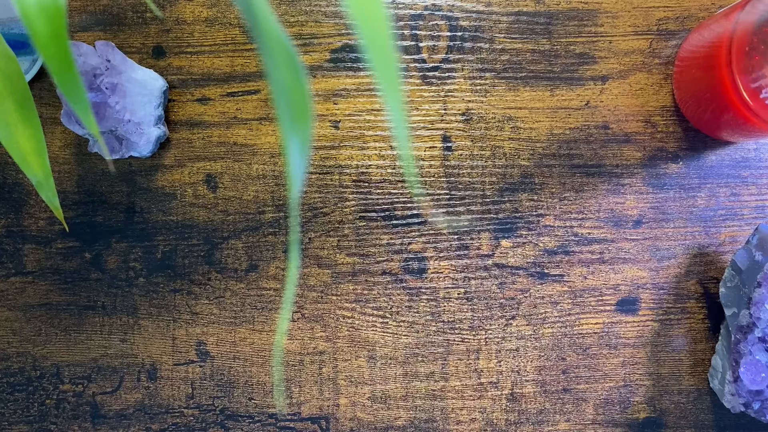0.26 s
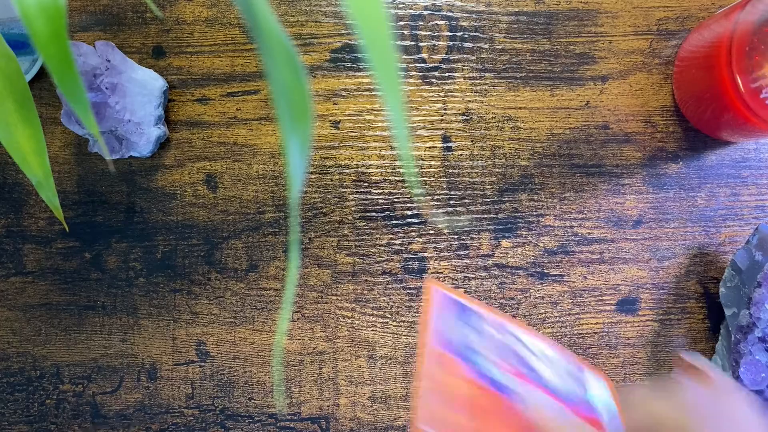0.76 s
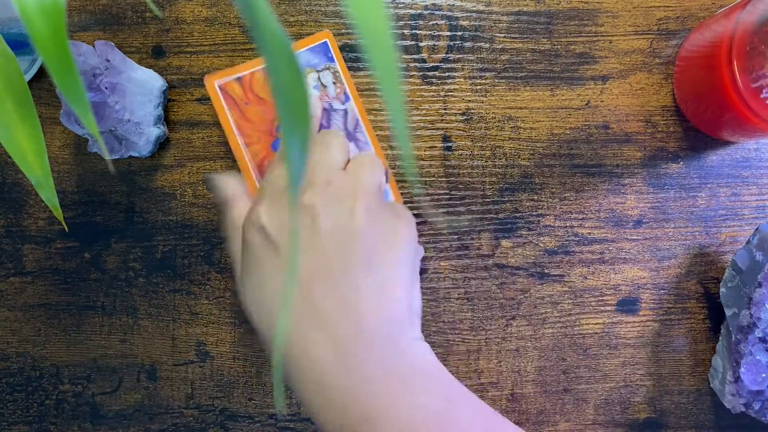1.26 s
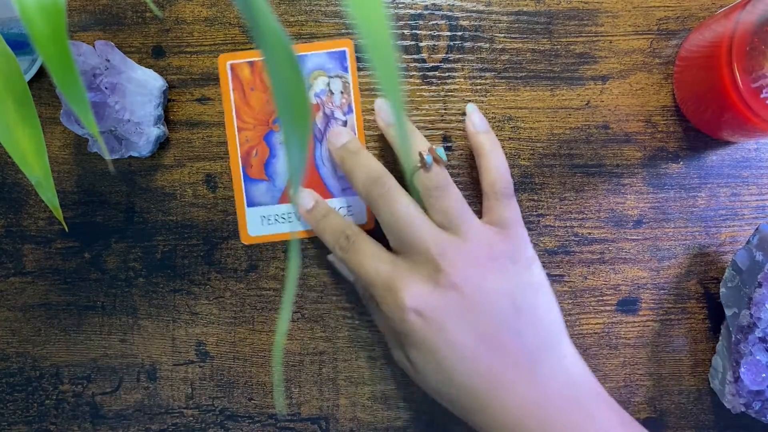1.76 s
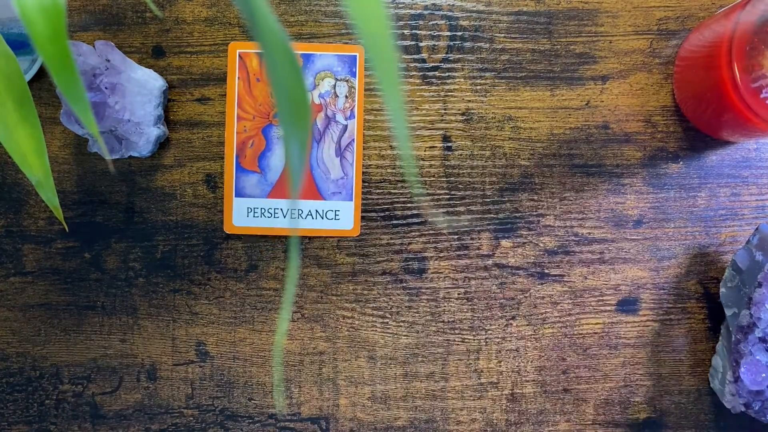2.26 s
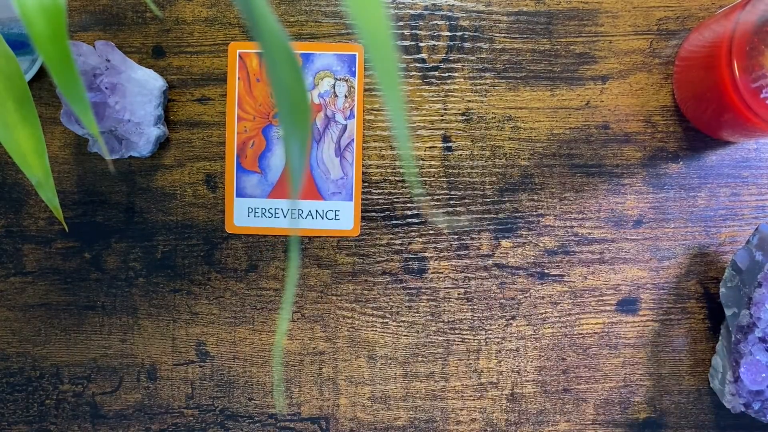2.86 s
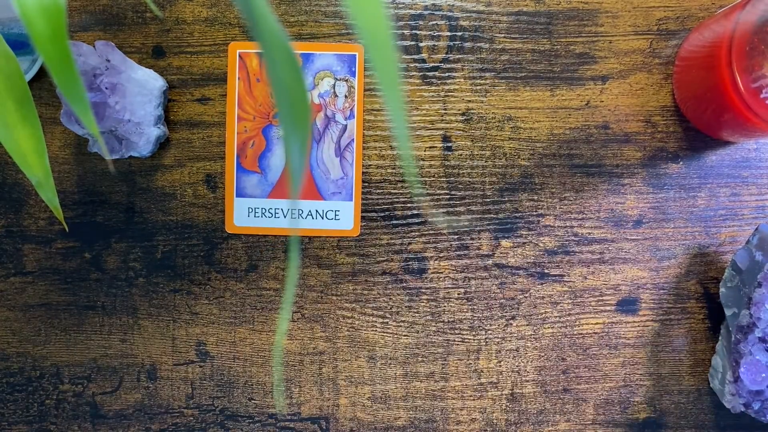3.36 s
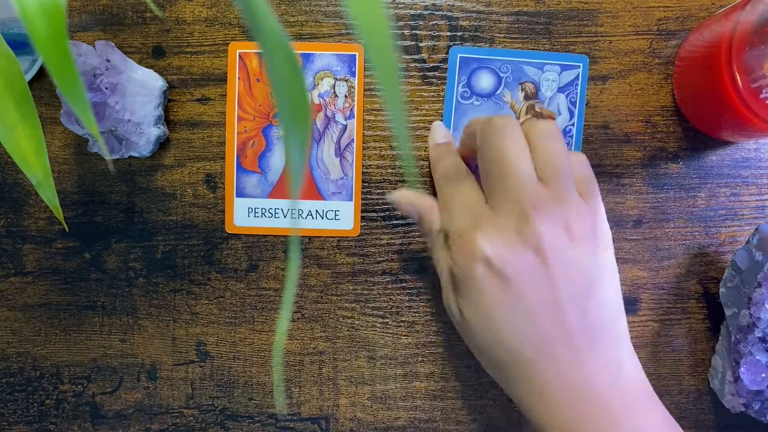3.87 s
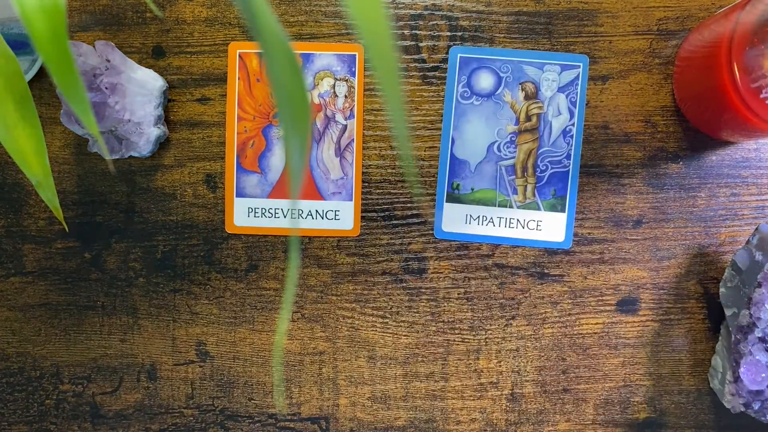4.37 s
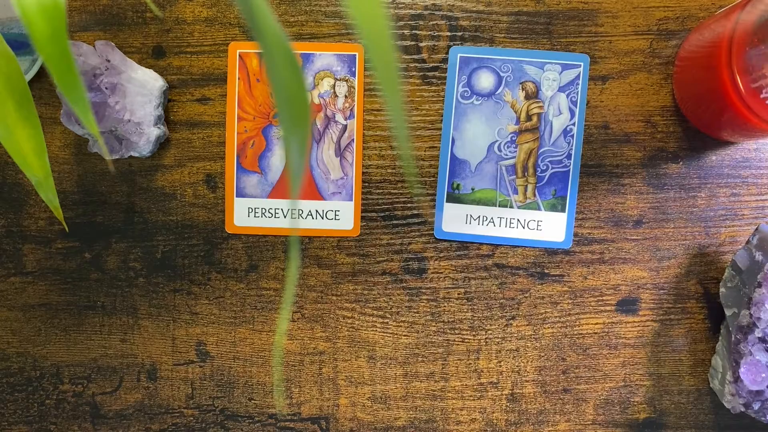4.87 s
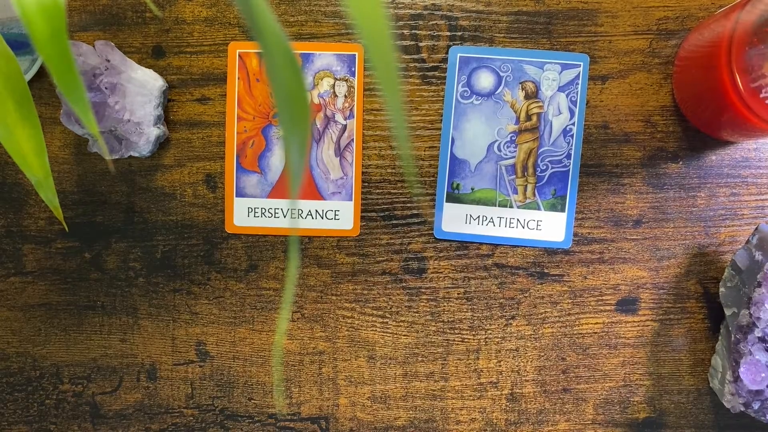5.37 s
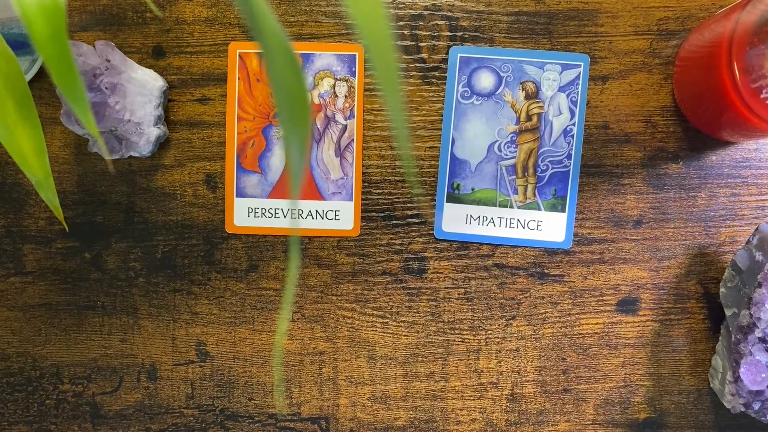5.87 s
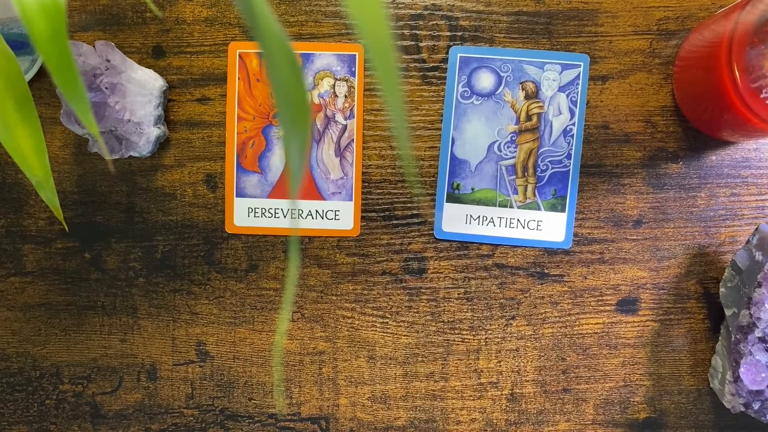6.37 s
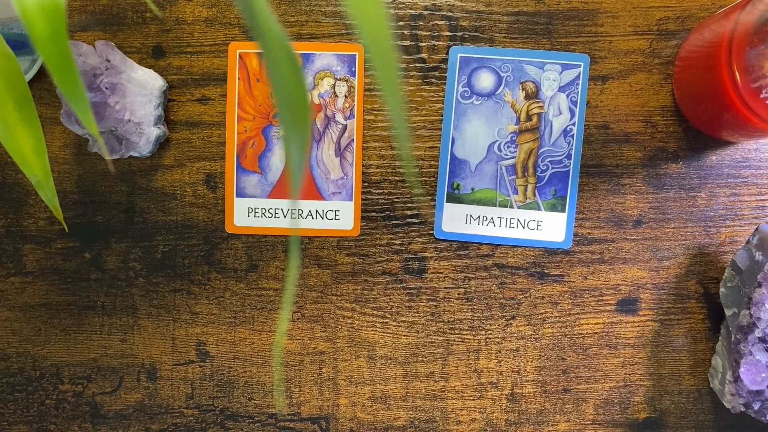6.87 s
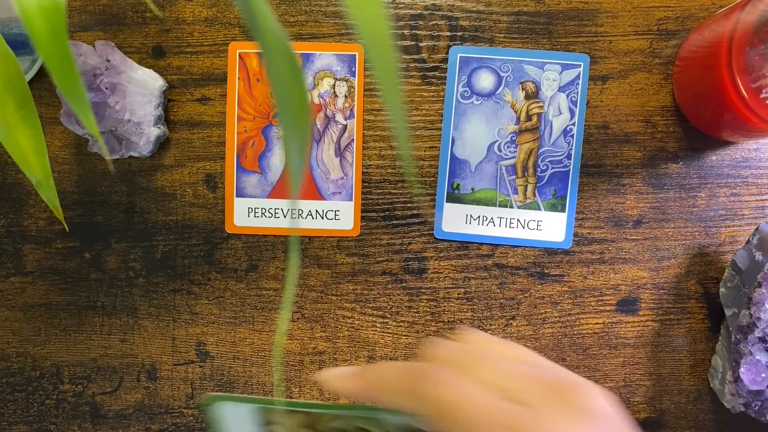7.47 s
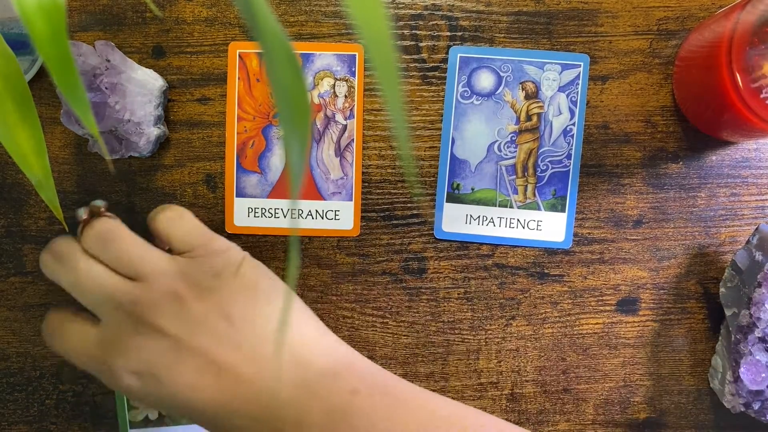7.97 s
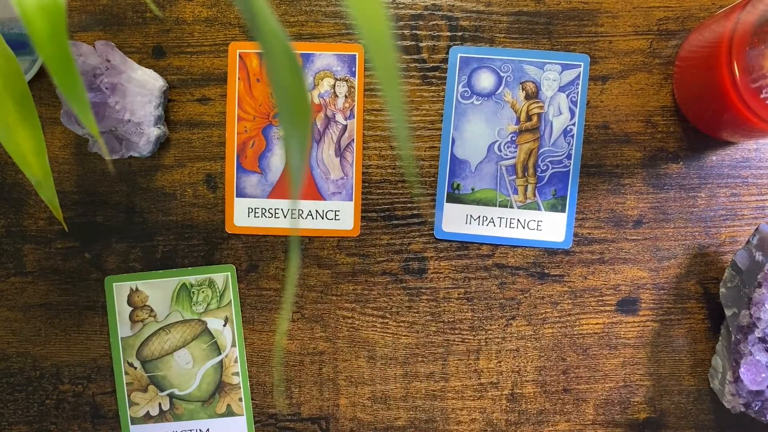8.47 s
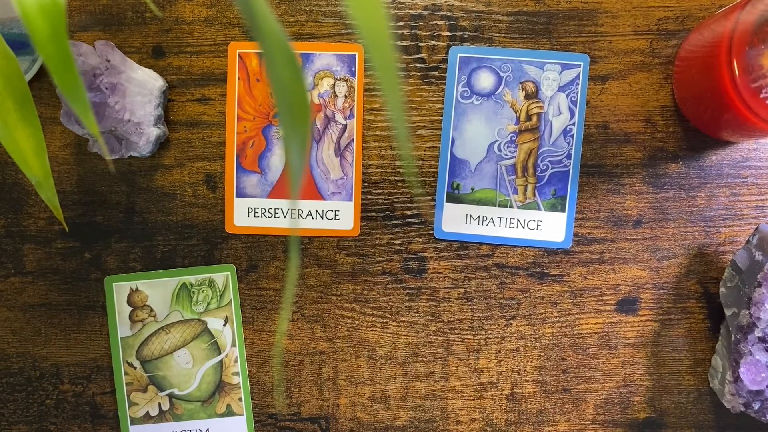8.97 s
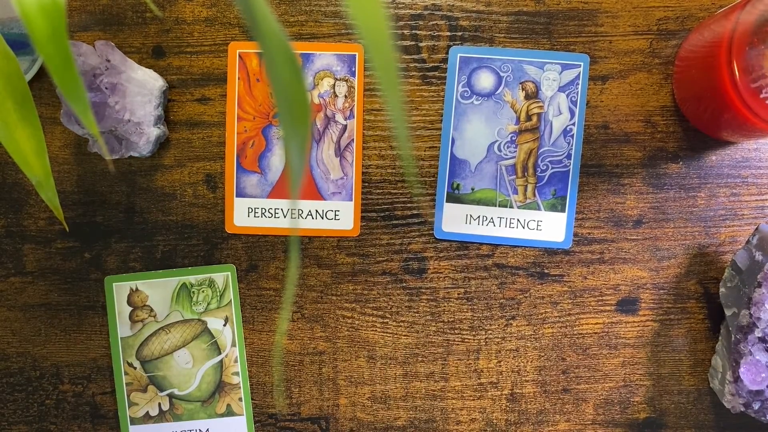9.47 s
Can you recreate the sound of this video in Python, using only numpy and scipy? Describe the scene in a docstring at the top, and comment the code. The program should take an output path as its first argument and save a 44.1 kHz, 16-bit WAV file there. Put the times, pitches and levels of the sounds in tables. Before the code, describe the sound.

Stiff cards are handled and laid on a wooden table, heard up close in a small furnished room. A faint low motor hum runs from the start, weakens around 3 seconds and is gone by 5. Crisp edge snaps, swishes and a thud come at about 0.3 to 0.7 seconds, followed by lighter taps and scrapes. The sharpest double snap lands near 2.6 seconds, as one card slides off the deck in a smooth hiss lasting until about 3.7. Firm snaps and knocks cluster between 3.1 and 4 seconds. From 4.4 to 5, fingers thud on the wood and set it rumbling. Softer rubbing follows, then scattered flicks, slides and taps from 6 to 8 seconds. After a brief near-silent pause, more dull knocks, light snaps and low rumbling run from 8.7 seconds to almost 10.

```python
"""A wooden table in a small furnished room, heard up close from a phone resting on it.
Stiff cards are drawn off a deck, flexed, snapped and laid down: edges crack, faces swish past each
other and scrape over grain and cloth, fingers thud the board and set it ringing and rumbling.
One glossy card slides off in a long hiss. A motor hums through the first five seconds.
Between gestures the sound sinks to near silence."""
import sys
import numpy as np
from scipy import signal
from scipy.fft import rfft, irfft
from scipy.io import wavfile
from scipy.ndimage import uniform_filter1d

SR = 44100
rng = np.random.default_rng(int(sys.argv[2]) if len(sys.argv) > 2 else 0)


def wrap_up_sound(samples):
    """Save the sound to the file named by the first command line argument, as 16-bit audio."""
    columns = np.atleast_2d(samples).T
    # keep every value between -1 and 1, then stretch to whole-number steps
    tamed = np.clip(columns, -1, 1)
    steps = np.round(tamed * 32767).astype(np.int16)
    wavfile.write(sys.argv[1], SR, steps)


N = 429093
ATTACK_S = 0.13  # drags, ringings and the glide fade in by 60 dB over this time


def undb(db):
    return 10 ** (np.asarray(db) / 20)


def unit(x):
    return x / np.sqrt(np.mean(x ** 2))


def decay(t, t60):
    return np.exp(-np.log(1000) * t / t60)


def ring(t, hz, t60):
    return np.sin(2 * np.pi * hz * t) * decay(t, t60)


def band(x, lo_hz, hi_hz):
    sos = signal.butter(2, [lo_hz, min(hi_hz, .45 * SR)], "band", fs=SR, output="sos")
    return signal.sosfilt(sos, x)


def colour(x, points):
    """EQ through (frequency [Hz], gain [dB]) points; rms 1."""
    hz, db = np.transpose(points)
    freqs = np.maximum(np.arange(len(x) // 2 + 1) * SR / len(x), 1)
    gain = undb(np.interp(np.log(freqs), np.log(hz), db))
    return unit(irfft(rfft(x) * gain, len(x)))


def wander(rate_hz):
    """Slewed sample-and-hold modulation; rms 1."""
    step = int(SR / rate_hz)
    held = np.repeat(rng.standard_normal(N // step + 1), step)
    return unit(uniform_filter1d(held, step)[:N])


def add(out, start_s, x):
    i = int(start_s * SR)
    out[i:i + len(x)] += x[:N - i]


def gesture_power(start, db, attack, hold, release):
    """Summed power envelope of gestures; attack and release each span 60 dB."""
    t = np.arange(0, N + 64, 64) / SR
    start, db, attack, hold, release = (
        np.broadcast_to(c, len(start))[:, None] for c in (start, db, attack, hold, release))
    early = np.maximum(start - t, 0) / np.maximum(attack, .005)
    late = np.maximum(t - start - hold, 0) / np.maximum(release, .03)
    power = np.sum(undb(db - 60 * (early + late)) ** 2, axis=0)
    return np.interp(np.arange(N) / SR, t, power)


# the motor's fader: (time [s], level [dB])
HUM_FADER = [(0, -49), (2.7, -48.5), (3.6, -55.5), (4.5, -54.5), (5.2, -120)]
# its harmonics: (multiple of the motor rate, level re the fader [dB])
HUM_HARMONICS = [(2, 2.5), (3, -9), (4, -26)]
def motor_hum(motor_hz=98.9):
    """A low motor bed whose harmonics waver a little in pitch and strength."""
    phase = 2 * np.pi * np.cumsum(motor_hz * (1 + 0.0041 * wander(3))) / SR
    tone = sum(undb(db + 1.2 * wander(2.2)) * np.sin(k * phase) for k, db in HUM_HARMONICS)
    fader_db = np.interp(np.arange(N) / SR, *np.transpose(HUM_FADER))
    return np.sqrt(2) * tone * undb(fader_db)


def grit(spread_db):
    """Fibres slipping: noise in which a few grains are much larger."""
    return rng.standard_normal(N) * undb(spread_db * rng.exponential(size=N))


def fibre_catches(per_second, spread_db):
    """Lone fibres and edges catching: a gain with sparse spikes under a millisecond long."""
    caught = rng.random(N) < per_second / SR
    spikes = caught * undb(np.minimum(spread_db * rng.exponential(size=N), 15))
    return 1 + signal.fftconvolve(spikes, np.exp(-np.arange(256) / SR / 0.0003))[:N]


# EQ of the mid scrape, the airy sheen and the low rumble in the board: (frequency [Hz], gain [dB])
SCRAPE_EQ = [(300, -13.5), (450, 1), (800, -7), (1200, -5), (2100, -5), (3000, -5.5), (5000, -22),
             (8000, -40.5)]
SHEEN_EQ = [(2500, -22.5), (4000, -1.5), (5500, -1.5), (7200, 3), (9000, -2.5), (12000, -8.5), (15300, -15)]
RUMBLE_EQ = [(15, -47.5), (25, -23), (49, -1), (64, 5), (86, -4), (129, 2), (172, -7), (205, 5),
             (274, -9.5), (312, -0.5), (461, -16.5), (760, -29.5), (1040, -44.5), (1760, -120)]
# hands and cards dragging on the table:
# (time [s], hold [s], release t60 [s], scrape level [dB], sheen level [dB], rumble level [dB])
TABLE_DRAGS = [(0, 0, 0.37, -54, -50, -56.5), (0.1, 1, 0.59, -93, -79, -59.5),
               (0.312, 0.33, 0.49, -47, -48, -48), (0.704, 0.17, 0.26, -53.5, -64.5, -64.5),
               (1.12, 0.19, 0.23, -47.5, -50, -42), (1.402, 0.55, 0.53, -86, -100, -55.5),
               (1.708, 0.024, 0.27, -54, -50.5, -35.5), (2.038, 0, 0.28, -72.5, -65.5, -71),
               (2.192, 0.58, 1, -57, -57, -57.5), (2.403, 0.15, 0.4, -44, -47.5, -41.5),
               (2.678, 0.78, 0.66, -57, -72, -50), (3.286, 0.021, 0.1, -39, -35, -45),
               (3.339, 0.24, 0.45, -50, -53, -55.5), (3.783, 0.19, 0.34, -45.5, -47.5, -55),
               (4.059, 0.65, 0.91, -65.5, -89, -54), (4.459, 0.42, 0.17, -44, -49, -36),
               (4.814, 0.13, 0.43, -68, -70, -34.5), (4.949, 0.56, 0.37, -57.5, -63, -42.5),
               (5.078, 0, 0.24, -50, -74, -37), (5.432, 0.0074, 0.19, -57, -72, -34.5),
               (5.539, 0.43, 0.24, -52, -55.5, -40), (5.786, 0.076, 0.26, -48, -70.5, -37.5),
               (6.083, 0.1, 0.21, -85.5, -82.5, -52), (6.256, 0.4, 1, -61, -59.5, -49),
               (6.83, 0.17, 0.19, -58, -50.5, -55.5), (7.152, 0, 0.26, -47, -43, -50.5),
               (7.354, 0.36, 0.27, -91, -81.5, -59.5), (7.472, 0.54, 0.24, -60, -57, -54),
               (8.037, 0.17, 0.42, -83.5, -85, -58), (8.315, 0.047, 0.13, -95, -100, -59.5),
               (8.731, 0.16, 0.4, -50.5, -60.5, -45.5), (8.784, 0.38, 0.48, -56, -50.5, -39),
               (9.225, 0.46, 0.17, -60.5, -67, -43), (9.46, 0, 0.2, -67, -76, -35.5),
               (9.72, 0.13, .3, -47.5, -57, -39)]
def rubbing():
    """Friction on the table: scrape and sheen stutter together; the board carries a lumpy rumble."""
    start, hold, release, *layers_db = np.transpose(TABLE_DRAGS)
    scrape_power, sheen_power, rumble_power = (
        gesture_power(start, db, ATTACK_S, hold, release) for db in layers_db)
    # every swish trails a scrape and a sheen
    swish_s, body_db, treble_db, swell, _, hollow_db = np.transpose(CARD_SWISHES)
    hiss_db = body_db - 10 * np.log10(1 + undb(hollow_db) ** 2)  # the body without its resonance
    scrape_power += gesture_power(swish_s, hiss_db - 7, 7.2 * swell, hold=0, release=.18)
    sheen_power += gesture_power(swish_s, body_db + treble_db - 3, 8 * swell, hold=0, release=.16)
    # every landing shakes the board
    thud_s, thud_db, push_ms, _, _, shake_db = np.transpose(LANDINGS)
    rumble_power += gesture_power(thud_s, thud_db + shake_db, 12 * push_ms / 1000, hold=0, release=.18)
    stutter = undb(2.4 * wander(22) + 1.5 * wander(120)) * fibre_catches(per_second=70, spread_db=4)
    scrape = colour(grit(spread_db=2), SCRAPE_EQ) * np.sqrt(scrape_power)
    sheen = colour(grit(spread_db=2), SHEEN_EQ) * np.sqrt(sheen_power)
    rumble = colour(rng.standard_normal(N), RUMBLE_EQ) * np.sqrt(rumble_power)
    return (scrape + sheen) * stutter, rumble * undb(3.3 * wander(30))


def contact_flicker(friction):
    """Fifth-octave bands flicker and drift on their own as the contact patch wanders."""
    edges_hz = 300 * 2 ** (np.arange(30) / 5)
    # alternate signs let neighbouring bands join without a gap
    return sum((-1) ** k * band(friction, lo, hi) * undb(1.4 * wander(25) + 2.6 * wander(7) - 2)
               for k, (lo, hi) in enumerate(zip(edges_hz, edges_hz[1:])))


def card_stock(noise, hz, treble_db, hollow, width_ratio):
    """The voice of stiff card: a broad body, one hollow resonance and a bright edge."""
    resonance = unit(band(noise, hz / width_ratio, hz * width_ratio))
    body = unit(band(noise, 770, 5100)) + hollow * resonance
    return unit(body) + undb(treble_db) * unit(band(noise, 4500, 10000))


# edges cracking: (time [s], body level [dB], treble re body [dB], t60 [s], flexed card's pitch [Hz])
EDGE_SNAPS = [(0.137, -39.5, -14, 0.024, 1380), (.296, -41.5, 0, 0.013, 2000),
              (0.32, -24.5, -9, 0.025, 1520), (0.3246, -20.5, -24, 0.019, 1030),
              (0.5697, -13, -33, 0.018, 1240), (0.5882, -14.5, -26, 0.005, 2450),
              (0.621, -24.5, -12, 0.018, 1130), (0.7058, -16, -0.5, 0.014, 920),
              (1.065, -43, -15, 0.072, 830), (1.0995, -27, -12, 0.028, 755), (1.2782, -25, -33, 0.03, 1220),
              (1.316, -29.5, 3, 0.016, 1170), (1.693, -27, -2, 0.028, 3430),
              (1.7194, -53.5, 26, 0.017, 2290), (2.022, -55.5, 9.5, 0.022, 4000),
              (2.2278, -25.5, -15, 0.04, 3030), (2.399, -34, 0, 0.059, 680), (2.562, -24, -13, 0.016, 1980),
              (2.5766, -4, -18, 0.012, 4800), (2.5929, -3.5, -5.5, 0.0086, 2020),
              (2.882, -30.5, -11, 0.014, 880), (2.945, -33, -18, 0.006, 2200),
              (3.134, -21, -18, 0.018, 1280), (3.151, -10.5, -18, 0.0038, 1650),
              (3.265, -42, 13.5, 0.0092, 4800), (3.281, -32, -13, 0.11, 1500),
              (3.353, -20, -15, .015, 2280), (3.364, -14.5, -18, 0.013, 2560),
              (3.3842, -9.5, -13, 0.016, 1820), (3.5286, -17, -16, 0.019, 1140),
              (3.7248, -21.5, -33, 0.014, 850), (3.9205, -21.5, 17, 0.0098, 1080),
              (4.012, -37.5, -19, 0.1, 2050), (4.327, -40.5, -18.5, 0.016, 1500),
              (4.574, -31, -6, 0.031, 1440.0), (4.6, -24, -11, 0.017, 1790),
              (4.632, -10.5, -21, 0.011, 1420), (5.558, -48, 14, 0.014, 3000), (5.572, -37, 6, 0.0093, 920),
              (5.947, -18.5, 4.5, 0.016, 2980), (5.958, -34.5, 7.5, 0.03, 1310),
              (6.0592, -24, 9, 0.055, 2950), (6.3306, -24.5, -10, 0.0064, 2320),
              (6.403, -38, -4, 0.0078, 4450), (6.9228, -29, 0, 0.0084, 1640.0),
              (6.9542, -28.5, -10, 0.019, 1080), (7.079, -56.5, 4.5, 0.04, 1790),
              (7.186, -30, -1, 0.046, 4110), (7.3542, -25, -1.5, 0.005, 2470),
              (7.3837, -25, -27, 0.0074, 2590), (7.393, -19.5, 2, 0.0062, 970),
              (7.7251, -32.5, -24, 0.061, 1290), (7.88, -20, -26, 0.023, 2550),
              (7.975, -24, 7.5, 0.023, 3070), (8.701, -45, 1, 0.053, 4730), (8.92, -27.5, -3, 0.045, 1080),
              (9.0473, -25.5, -14, 0.0079, 2200), (9.0906, -28.5, -25, 0.059, 2400),
              (9.1565, -26.5, -1.5, 0.028, 710)]
def edge_snaps(attack_s=.0012):
    """A flexed edge lets go: a crack of noise that builds in about a millisecond and dies fast."""
    out, t = np.zeros(N), np.arange(4096) / SR
    attack = np.minimum(t / attack_s, 1) ** 2
    for start, db, treble_db, t60, hz in EDGE_SNAPS:
        envelope = attack * decay(np.maximum(t - attack_s, 0), max(t60, .004))
        crack = card_stock(rng.standard_normal(len(t)), hz, treble_db, hollow=0.8, width_ratio=1.17)
        add(out, start - attack_s, undb(db) * envelope * crack)
    return out


# card passing over card: (peak time [s], body level [dB], treble re body [dB], swell [s],
# pitch of the gap between them [Hz], its resonance re the plain hiss [dB])
CARD_SWISHES = [(0.177, -39.5, -16, 0.023, 1620, -8), (.215, -36, -20, 0.043, 1620, 8),
                (0.545, -27.5, -5.5, 0.036, 1900, -6.5), (.704, -33, -6, 0.013, 934, -2),
                (0.809, -43.5, -17, 0.032, 1010, 0.5), (1.109, -39.5, -17, 0.03, 1270, -4),
                (1.311, -41, -6, 0.06, 2800, -11), (2.17, -35, -10.5, 0.022, 1030, -8.5),
                (2.228, -43, -6, 0.027, 2880, -15), (2.45, -36, -6.5, 0.013, 1110, 3.5),
                (3.143, -34.5, -10, 0.013, 3200, -5), (3.362, -32.5, -3, 0.048, 2400, -4),
                (3.73, -29, -13, 0.0045, 940, -1), (3.816, -52, 12, 0.014, 950, 7),
                (3.87, -41.5, -21, 0.04, 3100, 12.5), (3.925, -23, -1.5, 0.0062, 1170, -7),
                (4.354, -40, -6, 0.02, 2260, -14), (4.519, -31.5, -12, 0.009, 1570, -3.5),
                (4.633, -29.5, -10.5, 0.011, 1380, -10), (4.691, -32.5, -3.5, 0.031, 2370, -19.5),
                (4.858, -33.5, -13, 0.014, 2390, -16.5), (5.003, -47, -9, 0.0051, 2680, -26),
                (5.252, -42, -5, 0.025, 2670, -13), (5.297, -48, 1, 0.013, 2770, 19),
                (5.441, -52, -1.5, 0.02, 2880, -17), (5.569, -40.5, -13, 0.013, 3020, -12),
                (5.695, -51.5, 1.5, 0.015, 2600, -19), (5.805, -52, 4.5, 0.022, 2600, -26),
                (6.063, -44, -1, 0.046, 2600, -30), (6.266, -37.5, -1, 0.013, 2380, -13),
                (6.7, -51.5, 2.5, 0.023, 2880, 4), (6.906, -43.5, 4.5, 0.029, 5760, -25),
                (7.388, -41, -7, 0.022, 5530, -6), (7.507, -42, -2, 0.015, 3360, -12),
                (7.884, -32, -6.5, 0.027, 1404, -14), (7.974, -40.5, 0.5, 0.032, 4590, 3.5),
                (9.042, -33.5, -4, 0.013, 2500, -14), (9.094, -39.5, 1, 0.016, 2320, -6),
                (9.291, -38.5, -7, 0.023, 4560, -3.5), (9.369, -39, -5.5, 0.013, 3950, -5.5),
                (9.478, -42, 4, 0.0088, 3000, -3), (9.667, -46, 2, 0.0079, 4270, -14)]
def card_swishes(lead_s=.15, fade_s=.013):
    """Fluttering friction hiss that swells and fades as one card passes another."""
    out, t = np.zeros(N), np.arange(16384) / SR - lead_s
    for peak_s, db, treble_db, swell_s, hz, hollow_db in CARD_SWISHES:
        # half strength one swell before the peak and one fade after it
        envelope = .5 ** ((t / np.where(t < 0, swell_s, fade_s)) ** 2)
        hiss = card_stock(rng.standard_normal(len(t)), hz, treble_db, undb(hollow_db), width_ratio=1.22)
        add(out, peak_s - lead_s, undb(db) * envelope * hiss)
    return out * undb(0.87 * wander(130))


# modes of the table top: (frequency [Hz], relative level [dB], t60 [s])
BOARD_MODES = [(62, -8, 0.021), (125, -11, 0.05), (179, -0.5, 0.045), (289, -18.5, 0.037),
               (440.5, -4.5, 0.11), (570, -9, 0.088), (880, -9.5, 0.095), (1160, -3, 0.047),
               (1430, -17, 0.017)]
# cards and fingers landing: (time [s], push level [dB], push length [ms], struck spot's pitch [Hz],
# its ring re the push [dB], board shake re the push [dB])
LANDINGS = [(0.326, -14.5, 0.58, 193, -29, -21), (0.5717, -7.5, 2.45, 115, -20.5, -16),
            (0.594, -19, 0.66, 154, 1.5, -22), (0.614, -17, 3.4, 103, -12, -23),
            (0.705, -17, 0.92, 866, -6, -27), (1.129, -23, 2.2, 300, -3.5, -15),
            (1.163, -29, 1.5, 410, 4.5, -18), (1.183, -25, 2, 332, -3, -23),
            (1.311, -17.5, 5.4, 137, -23, -16), (1.327, -21, 4.9, 197, -8, -7.5),
            (1.5203, -18, 4.4, 207, 2, -25), (1.55, -36.5, 2.2, 300, -8.5, -21.5),
            (1.579, -31, 2.3, 150, -10, -20), (1.59, -32.5, 2, 493, -6, -23),
            (1.73, -38, 3.1, 190, -7, -15), (2.162, -24.5, 0.45, 66, -6.5, -15.5),
            (2.234, -30.5, 5.2, 97, -26, -12), (2.403, -18.5, 0.58, 200, -3, -28),
            (2.431, -26, 2.3, 180, 4, -19), (2.447, -28.5, 2.5, 187, 1, -20),
            (2.57, -22, 4.5, 100, -17, -23), (2.595, -19.5, 3.2, 178, -28, -25),
            (3.1503, -5, 3.96, 70, -11, -20.5), (3.29, -27, 3.7, 312, -17, -21),
            (3.355, -10.5, 0.8, 95, -24, -12), (3.369, -9, 4.1, 111, -10, -25),
            (3.381, -9.5, 2.6, 91.5, -11, -29.5), (3.529, -25.5, 1.5, 213, -28, -16),
            (3.635, -32, 1.6, 525, -2.5, -21), (3.728, -28, 3.7, 89, 0, -10),
            (3.776, -19, 1.15, 185, -14, -16.5), (3.923, -8.5, 0.7, 425, -5, -8.5),
            (3.932, -18, 1.2, 424, 1.5, -20), (4.328, -25.5, 2.2, 199, -28, -9),
            (4.454, -18, 3, 296, 6, -20), (4.468, -16.5, 4.3, 110, -22, -1),
            (4.517, -21.5, 2.4, 233, -3, 2), (4.552, -19, 3.2, 170, 1, -3.5),
            (4.635, -13.5, 2.8, 283, -2.5, -3), (4.681, -18, 1.1, 232, 0, -5),
            (4.697, -20, 2.1, 111, -8, -9), (4.862, -28, 1.5, 230, -4, 4),
            (5.98, -23.5, 0.75, 302, -9, -4.5), (6.027, -24.5, 2.2, 160, -7, -6),
            (6.074, -24.5, 7.6, 192, -6.5, -10.5), (6.375, -27, 3, 300, -7.5, -4),
            (6.422, -28, 2.1, 104, -5.5, -9), (6.9, -25, 8.3, 112, -11, -13),
            (6.955, -21, 2.6, 240, -6.5, -12.5), (7.133, -8, 1.27, 530, -23, -20.5),
            (7.135, -14, 0.56, 850, -5.5, -17), (7.202, -22, 3.2, 111, -5.5, -15),
            (7.397, -19, 0.83, 104, -4.5, -24.5), (7.532, -17, 4.2, 307, -11.5, -15.5),
            (7.726, -25.5, 9.3, 82.5, 3, -28), (7.88, -18.5, 10.7, 65, -16, -15.5),
            (7.882, -25.5, 0.34, 1397, 9.5, -20), (7.979, -18, 2.95, 188, -15, -11.5),
            (8.147, -39.5, 7.1, 134.4, -14, -24.5), (8.704, -28, 5.6, 89.8, -6.5, -10.5),
            (8.751, -26.5, 2, 301, -1, -4), (8.925, -30, 1.7, 390, -11, -12),
            (9.072, -24.5, 5.5, 128, 4.5, -2), (9.117, -26.5, 8, 80, -6, -5.5),
            (9.16, -19, 3.4, 212, -2, -6.5), (9.287, -26.5, 4.9, 212, -7, 0),
            (9.722, -25.5, 2.8, 277, 4, -16)]
def table_thuds(board_db=-10.5, spot_t60_s=.055):
    """A landing is one inward push of air and wood with a slower rebound; the board rings briefly."""
    out, t = np.zeros(N), np.arange(8192) / SR
    for start, db, push_ms, spot_hz, spot_db, _ in LANDINGS:
        push = -np.blackman(int(SR * push_ms / 1000) + 3)
        width = len(push)
        # each landing spot excites the modes differently
        scatter = rng.standard_normal((len(BOARD_MODES), 2))
        modes = sum(undb(mode_db + 4 * louder) * ring(t, hz * (1 + .05 * detune), t60)
                    for (hz, mode_db, t60), (louder, detune) in zip(BOARD_MODES, scatter))
        contact = push[::2]  # the wood feels a contact half as long as the push of air
        board = signal.fftconvolve(modes, contact)[:len(t)]
        spot = signal.fftconvolve(ring(t, spot_hz, spot_t60_s), contact)[:len(t)]
        thud = undb(board_db) * board / np.abs(board).max()
        lag = width // 2  # the struck spot swings back as the contact ends
        thud[lag:] -= undb(spot_db) * spot[:-lag] / np.abs(spot).max()
        thud[:width] += push
        thud[width:3 * width] += 0.3 * np.hanning(2 * width)  # rebound
        add(out, start - width / 2 / SR, undb(db) * thud)
    return out


# faint ringing after some contacts: (time [s], hold [s], level [dB], pitch [Hz])
AFTER_RINGS = [(0.843, 0.2, -66.5, 2110), (1.724, 0.085, -66, 3600), (1.768, 0.052, -71, 1283),
               (2.444, 0.034, -30, 194.6), (4.206, 0.088, -48.5, 479)]
def after_rings(width_ratio=1.06, release_s=.29):
    """Thin, pitched bands of hiss that hang on and die away."""
    out, noise = np.zeros(N), rng.standard_normal(N)
    for start, hold, db, hz in AFTER_RINGS:
        envelope = np.sqrt(gesture_power([start], db, ATTACK_S, hold, release_s))
        out += envelope * unit(band(noise, hz / width_ratio, hz * width_ratio))
    return out


# one long draw off the deck: (time [s], hold [s], release t60 [s], level [dB])
DECK_DRAW = (2.5, 1.14, 0.24, -46.5)
# its hollow colour: (frequency [Hz], gain [dB])
GLOSS_EQ = [(350, -18.5), (600, 0), (1170, -7.5), (1920, -2.5), (2900, -9.5), (4200, -12), (4900, -6),
            (5500, -22.5), (6500, -9.5), (7800, -11.5), (9400, -24), (10300, -16.5), (12000, -15.5),
            (13000, -24.5), (15300, -27)]
def glossy_glide():
    """Gloss sliding on gloss gives a smooth, even hiss."""
    start, hold, release, db = DECK_DRAW
    hiss = colour(grit(spread_db=1), GLOSS_EQ) * undb(wander(20))
    return hiss * np.sqrt(gesture_power([start], db, ATTACK_S, hold, release))


def room_echoes(x, t60_s=.18):
    """Dense early echoes of a small furnished room, after a 3 ms pre-delay."""
    t = np.arange(16384) / SR
    tail = band(rng.standard_normal(len(t)), 220, 9000) * decay(t, t60_s) * (t > .003)
    return signal.fftconvolve(x, tail / np.sqrt(np.sum(tail ** 2)))[:N]


def scene():
    """Mono mix: the cards get a touch of room; rumble, ringing and motor stay dry."""
    scrape, rumble = rubbing()
    cards = edge_snaps() + table_thuds() + contact_flicker(scrape + card_swishes()) + glossy_glide()
    return (cards + undb(-23) * room_echoes(cards) + rumble + after_rings() + motor_hum())[None]


def record(dry):
    """The phone drops the deepest bass, rounds the loudest peaks and cuts the top."""
    low_cut = signal.butter(3, 48, "high", fs=SR, output="sos")
    high_cut = signal.ellip(8, .2, 65, 15250, fs=SR, output="sos")
    rounded = .95 * np.tanh(signal.sosfilt(low_cut, dry) / .95)
    return signal.sosfilt(high_cut, rounded)


dry = scene()
out = record(dry)
wrap_up_sound(out)
```